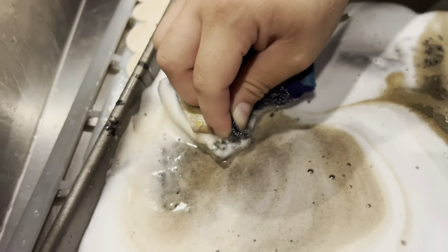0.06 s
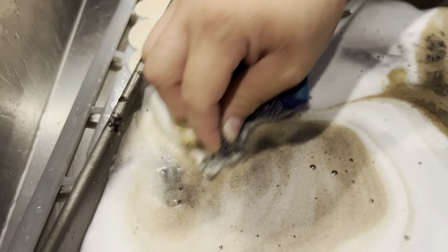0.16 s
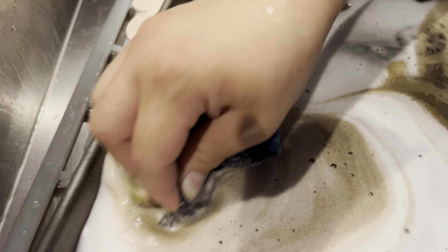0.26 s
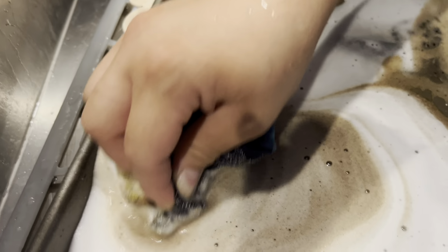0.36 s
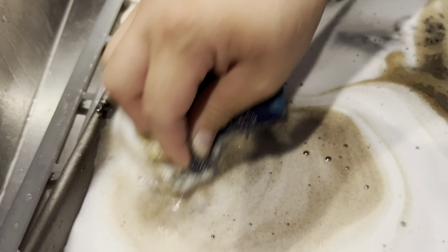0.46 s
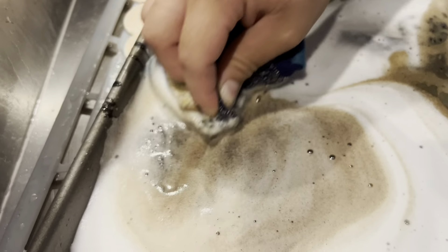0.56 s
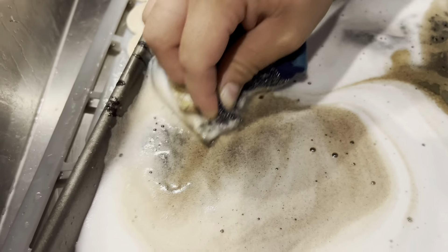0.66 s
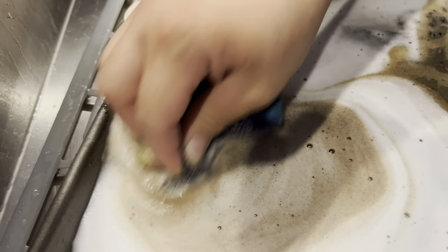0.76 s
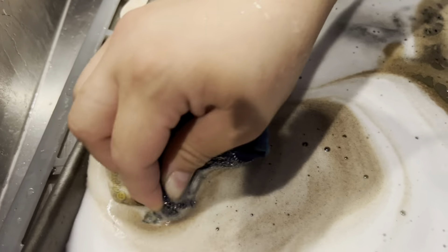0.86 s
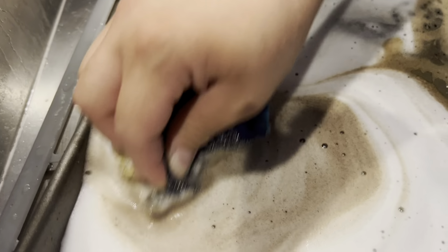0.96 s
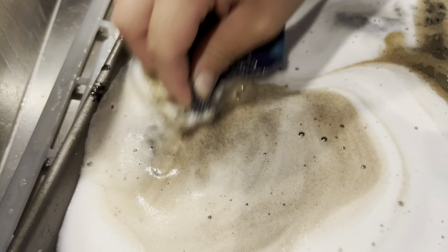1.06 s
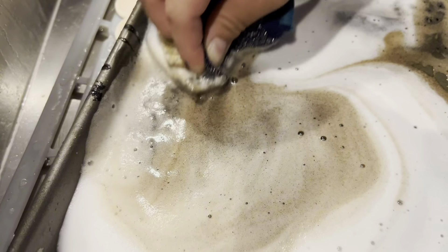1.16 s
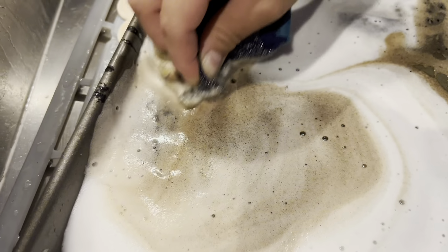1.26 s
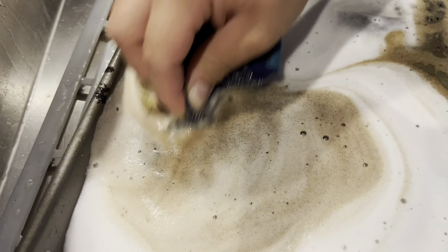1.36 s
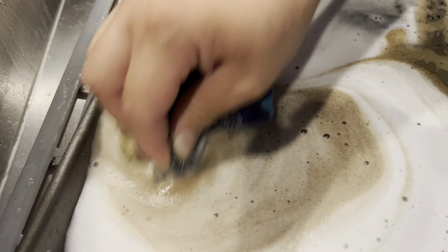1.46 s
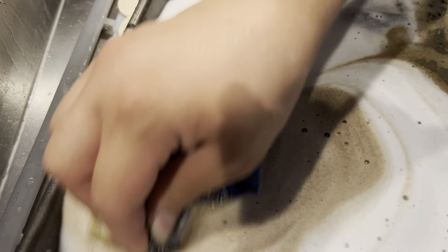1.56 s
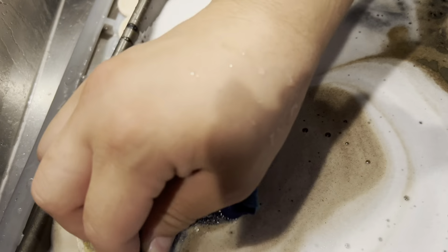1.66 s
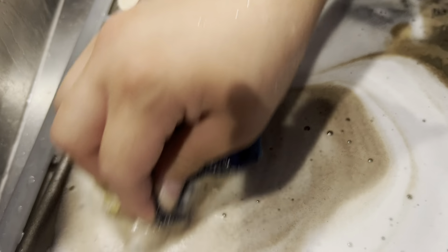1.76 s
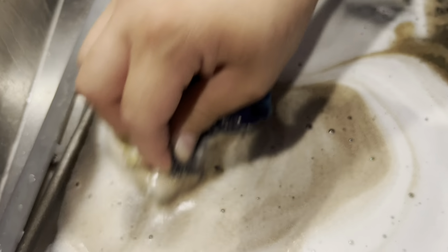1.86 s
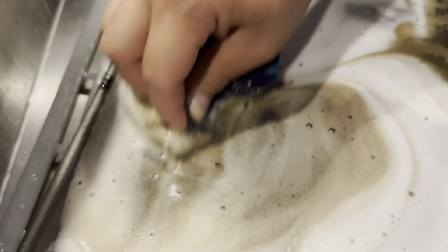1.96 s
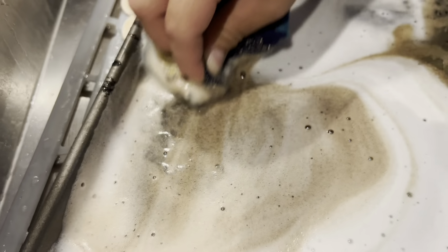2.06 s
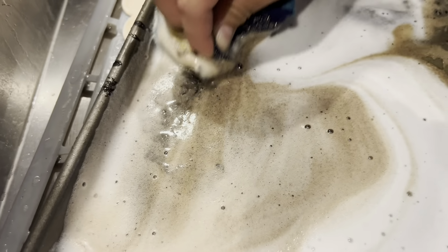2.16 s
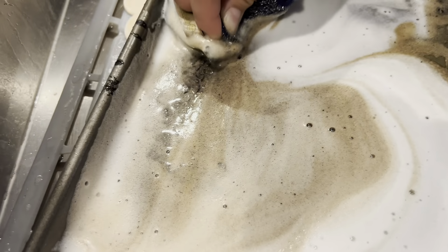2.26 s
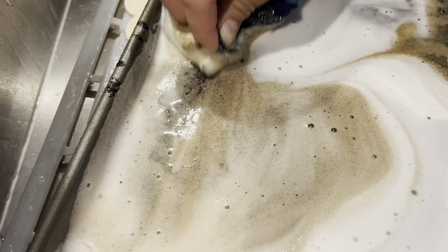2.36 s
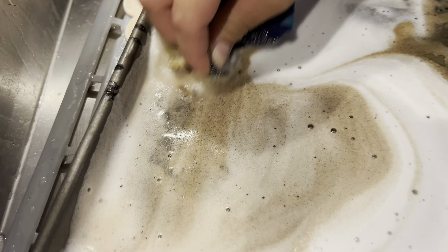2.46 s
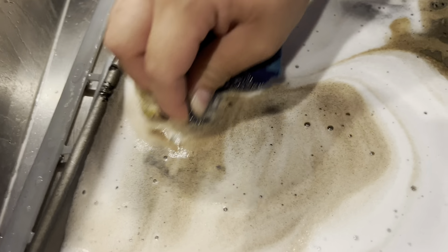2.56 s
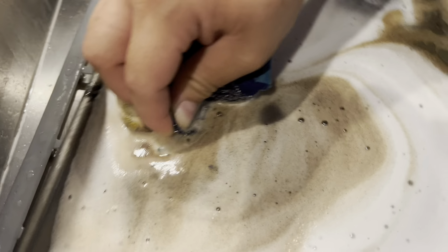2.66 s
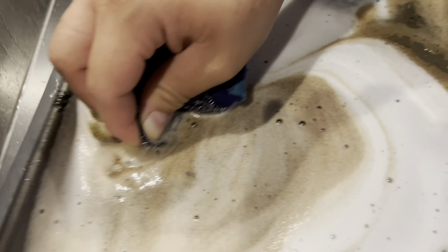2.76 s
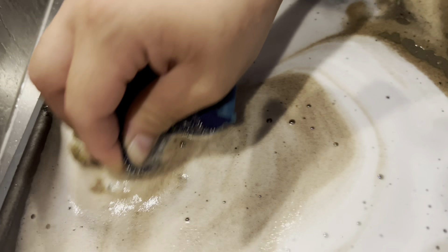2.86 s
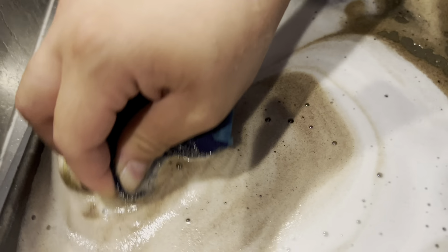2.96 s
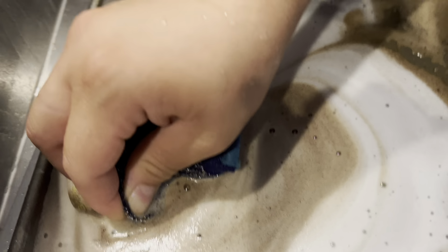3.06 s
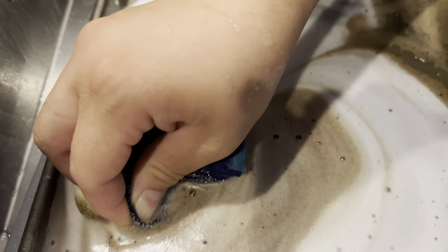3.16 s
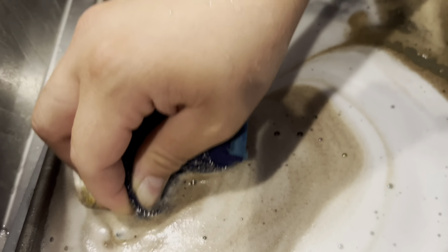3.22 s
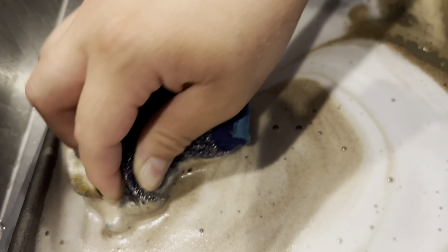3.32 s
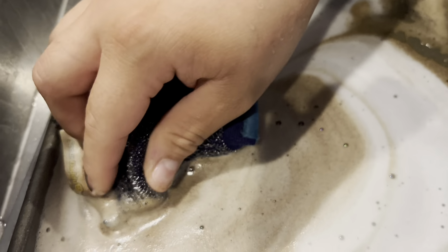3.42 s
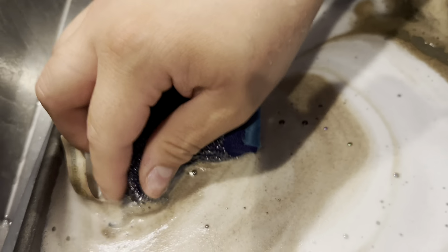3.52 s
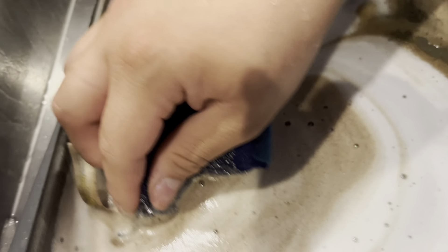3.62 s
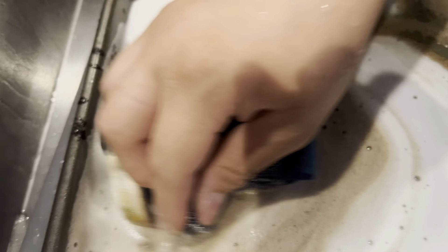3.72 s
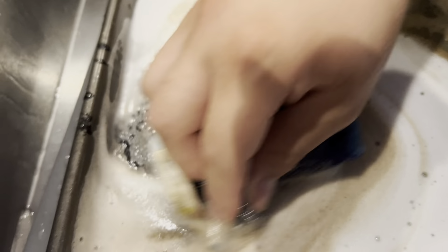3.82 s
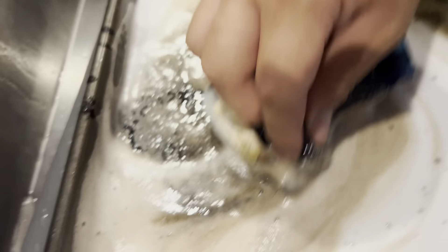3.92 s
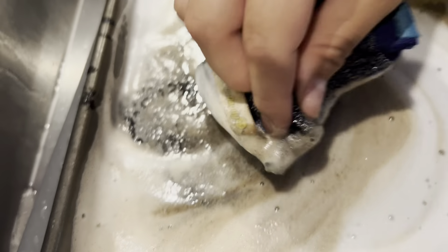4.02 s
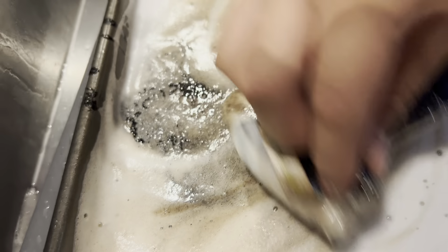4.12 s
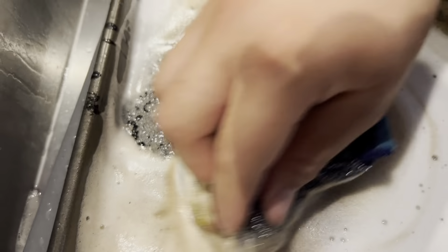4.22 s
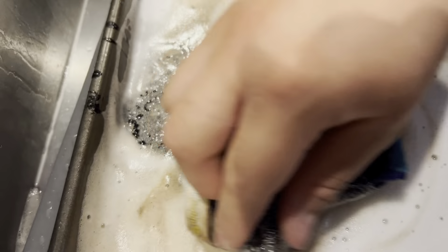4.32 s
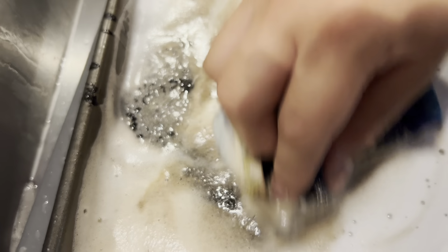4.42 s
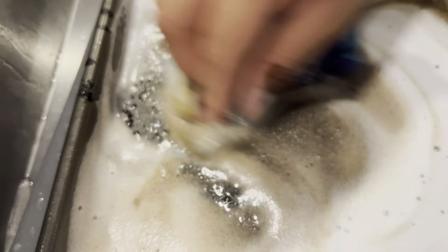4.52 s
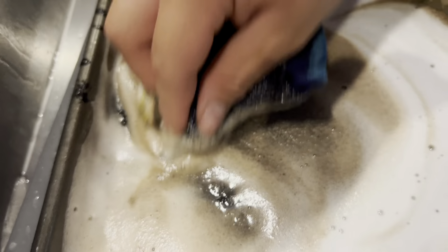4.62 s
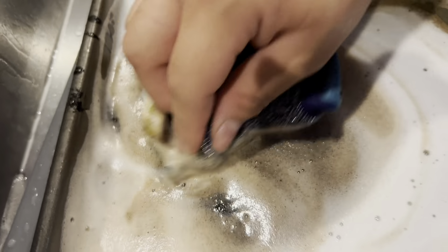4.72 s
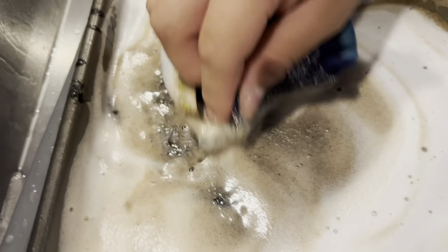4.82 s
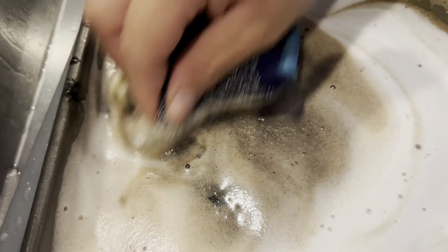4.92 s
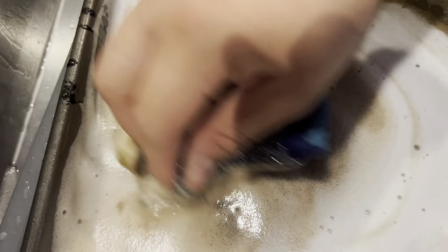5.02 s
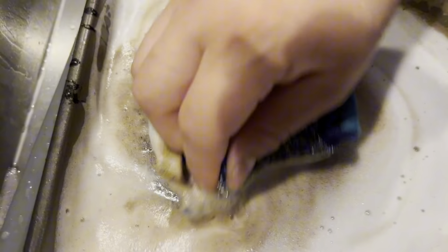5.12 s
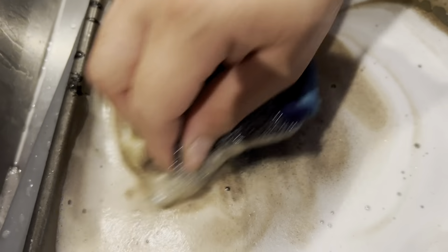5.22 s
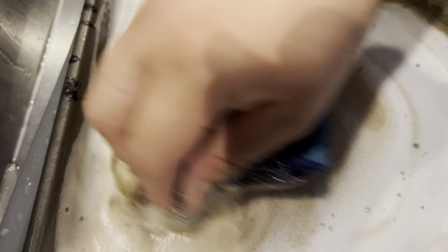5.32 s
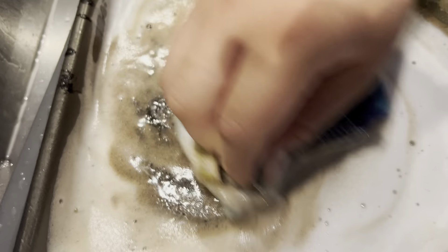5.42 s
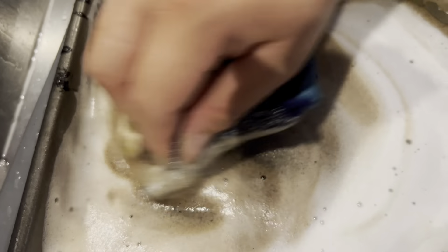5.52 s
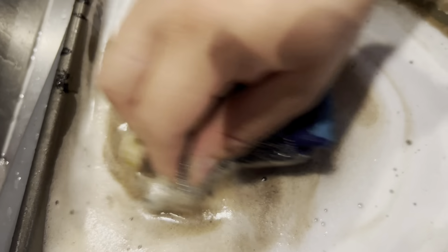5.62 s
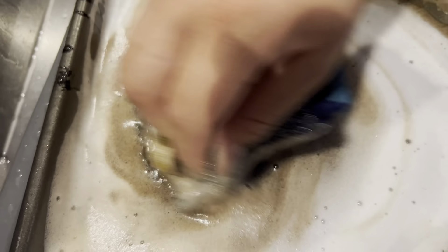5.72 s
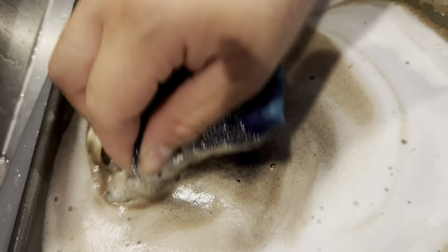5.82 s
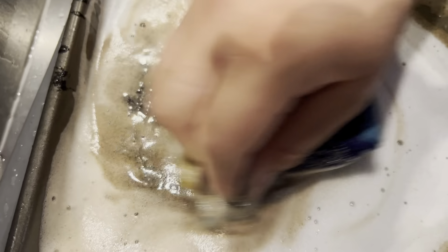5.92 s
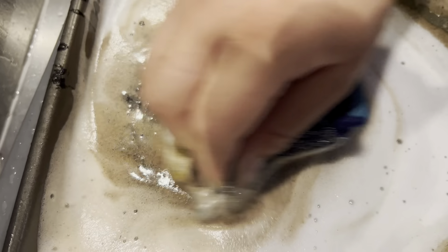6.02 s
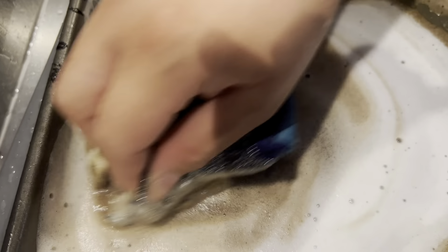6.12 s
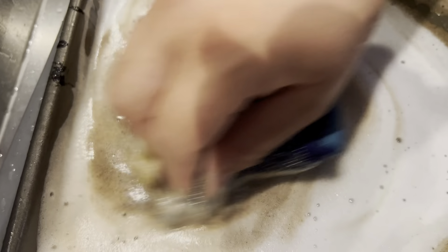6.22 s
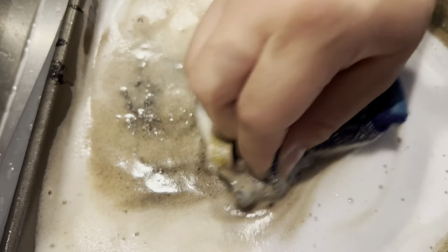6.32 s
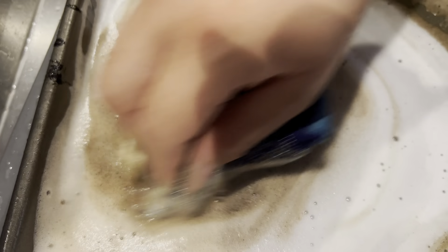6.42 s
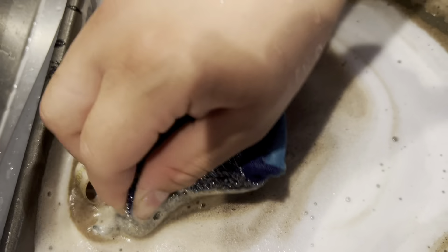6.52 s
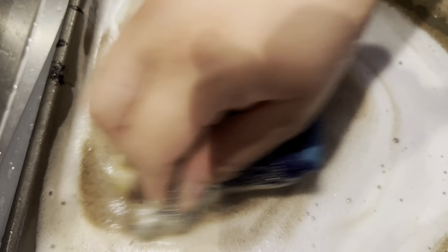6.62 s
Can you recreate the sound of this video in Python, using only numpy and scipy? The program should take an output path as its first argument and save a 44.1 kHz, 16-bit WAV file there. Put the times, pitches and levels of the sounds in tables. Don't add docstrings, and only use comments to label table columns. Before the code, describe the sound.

A scouring sponge scrapes a soapy steel baking sheet in long strokes, softens to light wipes, then scrubs quickly with booming thuds.

```python
import sys
import numpy as np
from scipy import signal
from scipy.fft import rfft, irfft, next_fast_len
from scipy.io import wavfile
from scipy.ndimage import uniform_filter1d

SR = 44100
rng = np.random.default_rng(int(sys.argv[2]) if len(sys.argv) > 2 else 0)


def wav_out(sig):
    wavfile.write(sys.argv[1], SR, np.round(np.clip(np.atleast_2d(sig).T, -1, 1) * 32767).astype(np.int16))


def boost_factor(decibels):
    exponent = np.asarray(decibels, float) / 20
    return 10 ** exponent


N = 294588


def unit(x):
    return x / np.sqrt(np.mean(x ** 2) + 1e-20)


def along(points, hz):
    f, value = np.transpose(points)
    return np.interp(np.log(hz + 1), np.log(f + 1), value)


def over_time(points):
    s, value = np.transpose(points)
    return np.interp(np.arange(N) / SR, s, value)


def wobble(rate):
    knots = rng.standard_normal(int(N * rate / SR) + 2)
    return np.interp(np.arange(N) * rate / SR, np.arange(len(knots)), knots)


def filtered(x, response):
    m = next_fast_len(N + SR // 8)
    return irfft(rfft(x, m) * response(np.fft.rfftfreq(m, 1 / SR)), m)[..., :N]


def mode(f, hz, width):
    return 1j * f * width / (hz * hz - f * f + 1j * f * width)


def strokes(power, lag_s, lean, late=0):
    slow = [(-0.152, 0.089, -38, 0.26, -5.5), (0.073, 0.332, -36, 0.49, -2.5), (0.339, 0.657, -41, .4, 2),
            (0.608, 0.883, -36, .52, -3), (0.857, 1.2, -38.5, 0.58, -4.5), (1.204, 1.686, -36, 0.44, -3),
            (1.667, 1.99, -43, 0.32, -6.5), (1.718, 2.318, -40.5, 0.49, -2),
            (2.28, 2.673, -36.5, 0.56, -1.5), (2.687, 3.036, -40.5, 0.49, -3),
            (3.172, 3.47, -53, 0.43, -9.5), (3.43, 3.616, -55.5, 0.51, -9), (3.578, 4.026, -42.5, 0.44, -2)]
    quick = [(4.083, 4.19, -52, 0.24, 5), (4.153, 4.301, -43, 0.36, -6.5), (4.247, 4.51, -42.5, 0.61, -3),
             (4.35, 4.582, -36.5, .72, -14), (4.564, 4.674, -40, 0.45, -9),
             (4.628, 4.917, -42.5, 0.53, -2.5), (4.753, 5.14, -37, 0.61, -5),
             (5.07, 5.232, -44.5, 0.52, -4.5), (5.177, 5.304, -40, 0.54, -12),
             (5.272, 5.463, -37.5, 0.43, -4.5), (5.391, 5.579, -37.5, 0.54, -1),
             (5.544, 5.699, -40, 0.58, 0), (5.662, 5.827, -37, 0.66, -5.5), (5.773, 5.994, -38, 0.62, -1),
             (5.961, 6.152, -36, 0.61, -7), (6.129, 6.36, -38.5, 0.53, -2.5),
             (6.331, 6.546, -34, 0.53, -5.5), (6.502, 6.723, -36, 0.65, -6.5)]
    start, end, db, fastest, lean_db = np.transpose(np.concatenate([slow, quick]))[:, :, None]
    t = np.arange(0, N, 32) / SR
    progress = np.clip((t - lag_s - start) / (end - start), 1e-9, 1)
    skew = np.log(0.5) / np.log(np.clip(fastest + late, 0.1, 0.9))
    speed = np.abs(np.sin(np.pi * progress ** skew))
    energy = np.sum((boost_factor(db + lean * lean_db) * speed ** power) ** 2, axis=0)
    energy = energy + boost_factor(-67.5) ** 2
    return np.interp(np.arange(N) / SR, t, 10 * np.log10(energy))


def kitchen():
    # f/Hz, level/dB
    hum_and_air = [(30, -13), (124, -7), (200, -21), (260, -16.5), (600, -37), (1070, -43), (2100, -46),
                   (9000, -36.5), (16000, -45)]

    def colour(f):
        spread = 1 / (1 + (300 / (f + 1)) ** 2)
        return boost_factor(along(hum_and_air, f)) * [1 + 0 * f, spread]

    mid, side = filtered(rng.standard_normal((2, N)), colour)
    return boost_factor(-56.0) * unit(np.array([mid + side, mid - side]))


def ticks():
    # t/s, peak level/dB, f/Hz
    catches = [(1.428, -18, 1040), (2.719, -27.5, 454.5), (3.024, -31, 1100), (3.171, -56, 830),
               (3.264, -49, 1040), (3.293, -36, 1070), (3.548, -35, 1030), (3.615, -29, 950),
               (3.657, -31, 926), (4.093, -36, 495), (4.34, -36, 1040), (3.197, -47, 1060),
               (3.222, -49, 840), (3.332, -37, 708), (3.505, -37, 1060), (3.591, -39, 1370)]
    out, t = np.zeros((2, N + SR)), np.arange(SR // 4) / SR
    attack = 1 - np.exp(-t / 0.0004)
    for s, db, hz in catches:
        tone = sum(boost_factor(-60 * t / 0.0087) * np.sin(2 * np.pi * hz * k * t) / k for k in (1, 1.7, 2.6))
        noise = uniform_filter1d(rng.standard_normal((2, len(t))), size=4)
        crack = 0.27 * boost_factor(-60 * t / 0.03) * noise
        level = boost_factor(db - 0.5 + np.array([[1.5], [-1.5]]))
        start = round(s * SR)
        out[:, start:start + len(t)] += level * (tone + crack) * attack
    return out[:, :N]


def knocks():
    # t/s, peak level/dB, f/Hz, t60/s
    bumps = [(0.183, -37, 155, 0.2), (0.389, -20, 169.4, 0.21), (0.732, -32, 158, 0.25),
             (1.346, -21, 152, 0.21), (2.383, -18.5, 220.5, 0.18), (3.76, -22.5, 159, 0.45),
             (4.099, -29.5, 155.7, 0.45), (4.362, -36.5, 177, 0.25), (4.755, -24, 171, 0.3),
             (5.875, -30, 175, 0.21), (6.235, -32, 159, 0.39), (6.424, -36, 151, 0.22),
             (0.305, -31, 105, 0.25), (0.381, -24, 110, 0.26), (1.44, -33, 82, .3), (2.25, -33.5, 90, 0.34),
             (2.498, -27, 86, 0.47), (3.415, -38.5, 120, 0.26), (4.014, -38, 146.3, 0.28),
             (2.14, -31, 179.4, 0.28), (4.12, -37, 90, 0.27), (6.31, -32, 124, 0.23),
             (5.031, -29, 124, 0.47), (5.818, -28, 64.4, .25), (6.485, -25, 84.3, 0.39)]
    out, t = np.zeros((2, N + SR)), np.arange(SR // 4) / SR
    attack = 1 - np.exp(-t / 0.0028)
    for s, db, hz, t60 in bumps:
        cycles = hz * (t + 0.0046 * (1 - np.exp(-t / 0.023)))
        start = round(s * SR)
        out[:, start:start + len(t)] += boost_factor(db - 6 - 60 * t / t60) * attack * np.sin(2 * np.pi * cycles)
    return out[:, :N]


def flex(modes):
    def body(f):
        rung = sum((-1) ** k * boost_factor(db) * mode(f, hz, width) for k, (hz, width, db) in enumerate(modes))
        return rung / (1 + (f / 320) ** 6) / (1 + (36 / (f + 1)) ** 4)

    return unit(filtered(rng.standard_normal((2, N)) * boost_factor(0.79 * wobble(25)), body))


def boom():
    # f/Hz, width/Hz, level/dB
    shallow = [(175, 22.6, 1.5), (148.5, 28, 0.5), (194.7, 23, -5), (298, 37, -12.5)]
    # f/Hz, width/Hz, level/dB
    deep = [(91.4, 23.6, 2.5), (105, 19.7, 2.5), (125, 24.5, -2.5), (50.4, 39, -7.5)]
    # t/s, level/dB
    weight = [(0, -7.5), (.5, -4), (1.0, -3), (1.45, 2.5), (1.75, -3.5), (2.1, 0.5), (2.5, 2.5), (2.85, 9),
              (3.3, 0), (3.8, 5.5), (4.1, -5), (4.45, -6), (4.7, 1.5), (5.1, 1.5), (5.4, 4.5), (5.9, -1),
              (6.25, 8), (6.68, 4)]
    shallow_db = strokes(1, lag_s=0.015, lean=1, late=-0.013) + 2.2
    deep_db = strokes(1, lag_s=0.028, lean=0.4, late=0.099) + over_time(weight) - 4.0
    mid, side = boost_factor(shallow_db) * flex(shallow) + boost_factor(deep_db) * flex(deep)
    return np.array([boost_factor(-0.4) * mid + boost_factor(-28) * side, boost_factor(0.53) * mid - boost_factor(-14.0) * side])


def scratch(spike_db, clump_db):
    size = boost_factor(spike_db * rng.exponential(size=N) + clump_db * (wobble(300) + wobble(45)))
    return unit(rng.standard_normal((3, N)) * size)


def ring(level, alike):
    # f/Hz, width/Hz, left level/dB, right level/dB, right phase/rad
    sheet = [(300, 40, -13.5, -4.5, 0.5), (462.5, 95, -0.5, -6, -1.5), (556, 112, -3, -12, -0.5),
             (692, 62, 0, -2, -1), (880, 95, 0, 0.5, 4), (1040, 80, 2, -0.5, 1.5), (1296, 66, -10, -3.5, 1),
             (1374, 81, -4, -2, -2), (1785, 260, -4.5, -8.5, -2), (2040, 220, -11, -19, 1.5),
             (2394, 187, -14, -9, .5), (2810, 140, -17, -18, -0.5), (3225, 300, -12, -21, -3.5),
             (4230, 600, -11.5, -39, -4), (5060, 620, -8.5, -42, -11)]
    hz, width, left_db, right_db, turn = np.transpose(sheet)
    sign = (-1) ** np.arange(len(hz))
    ports = sign * np.array([boost_factor(left_db) + 0j, boost_factor(right_db) * np.exp(1j * turn)])
    shared, *own = level * scratch(spike_db=1.2, clump_db=1.23)
    drive = np.sqrt(alike) * shared + np.sqrt(1 - alike) * np.array(own)
    return filtered(drive, lambda f: ports @ mode(f, hz[:, None], width[:, None]))


def hiss(level):
    # f/Hz, level/dB
    fibres = [(150, -42), (500, -9.5), (2000, 2), (4000, 0), (6500, -2.5), (9000, -2), (12500, -5.5),
              (15500, -4)]
    # f/Hz, share [0-1]
    likeness = [(1500, 0.15), (5000, 0.054), (7000, 0.63), (15000, 0.55)]
    lag_s = 1 / 6650 * np.array([[1], [-1]]) / 2

    def share(f):
        return np.clip(along(likeness, f), 0, 1)

    def common(f):
        return boost_factor(along(fibres, f)) * np.sqrt(share(f)) * np.exp(-2j * np.pi * f * lag_s)

    def separate(f):
        return boost_factor(along(fibres, f)) * np.sqrt(1 - share(f))

    grains = level * scratch(spike_db=1.92, clump_db=0.52)
    return filtered(grains[0], common) + filtered(grains[1:], separate)


def patchy(x, patchy_db):
    z = signal.stft(x, nperseg=512)[2]
    field = uniform_filter1d(rng.standard_normal(z.shape[1:]), size=4, axis=0)
    field = uniform_filter1d(field, size=9, axis=1)
    gain = boost_factor(patchy_db * unit(field))
    return signal.istft(z * unit(gain), nperseg=512)[1][:, :N]


def sponge():
    # t/s, level/dB
    freedom = [(0.1, -3), (.4, 1), (.75, -1), (1.3, -1.5), (1.52, 1), (1.72, 0.5), (2.45, -1.5),
               (2.86, 2.5), (3.3, -3), (3.7, 2.5), (4.36, 1.5), (4.47, -1.5), (5.03, 1), (5.25, 0.5),
               (5.76, 3.5), (6.0, 0), (6.25, 1.5), (6.45, -2.5)]
    hiss_db = strokes(1.285, lag_s=0, lean=0) + 6.0
    ring_db = strokes(1.365, lag_s=0.0013, lean=0.082) + over_time(freedom) + 0.59 * wobble(11) + 20.5
    scrub = patchy(hiss(boost_factor(hiss_db)) + ring(boost_factor(ring_db), alike=0.77), patchy_db=2.0)
    left_over_right_db = 1.5 + 0.33 * wobble(3.88)
    return scrub * boost_factor(left_over_right_db / 2 * np.array([[1], [-1]]))


def scene():
    return kitchen() + ticks() + knocks() + boom() + sponge()


def low_pass(x):
    return signal.sosfilt(signal.butter(12, 16460, fs=SR, output="sos"), x)


def record(dry):
    return low_pass(dry)


dry = scene()
out = record(dry)
wav_out(out)
```